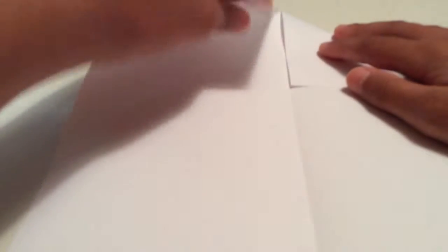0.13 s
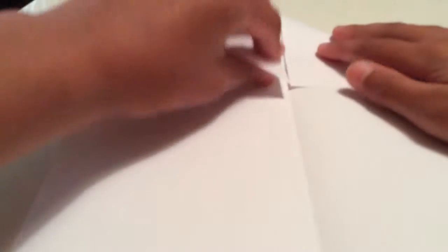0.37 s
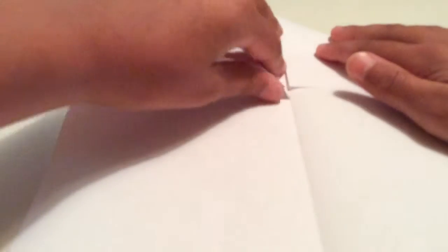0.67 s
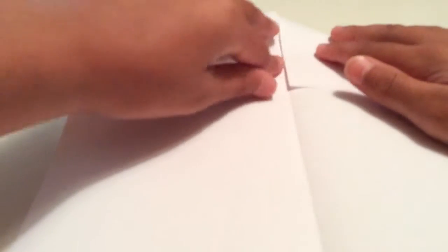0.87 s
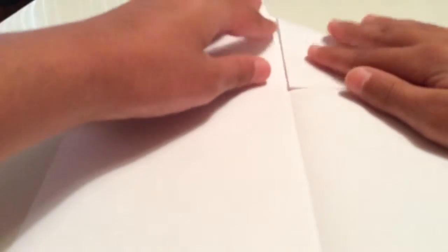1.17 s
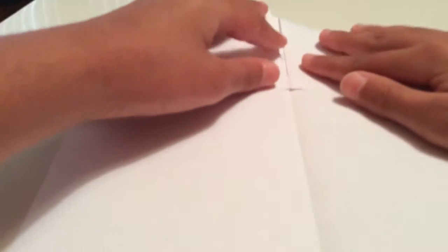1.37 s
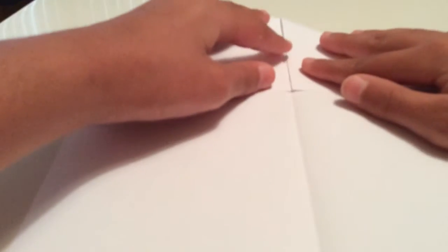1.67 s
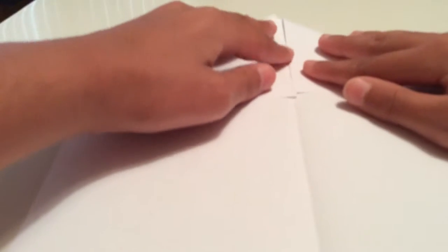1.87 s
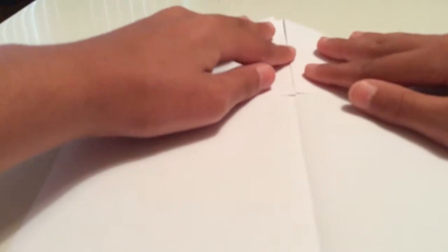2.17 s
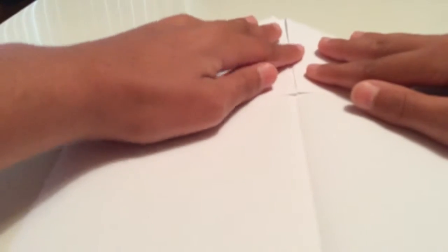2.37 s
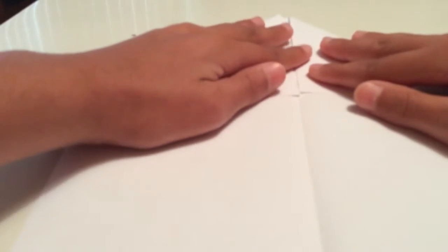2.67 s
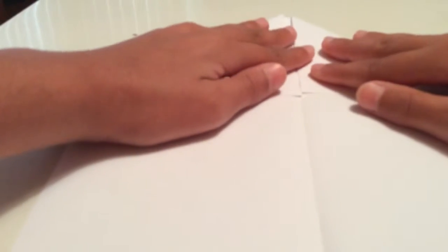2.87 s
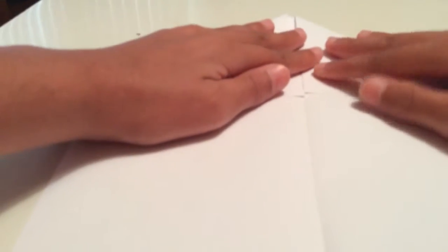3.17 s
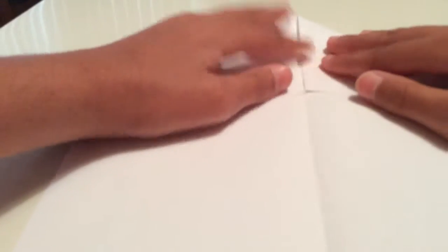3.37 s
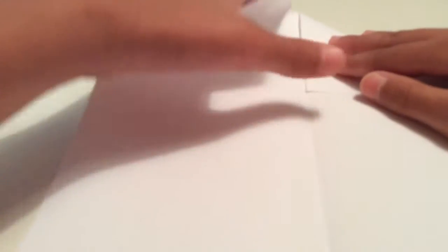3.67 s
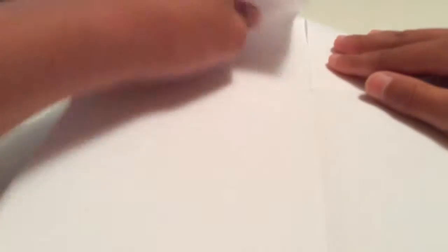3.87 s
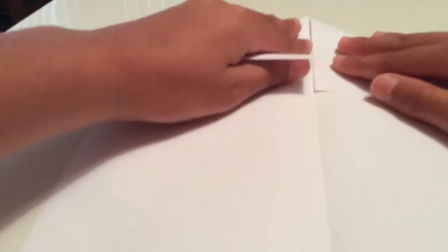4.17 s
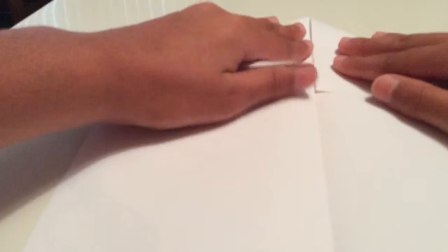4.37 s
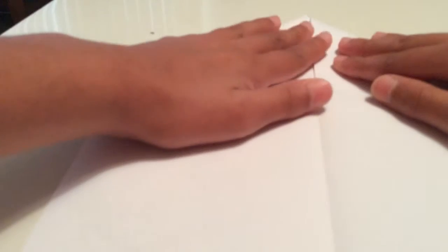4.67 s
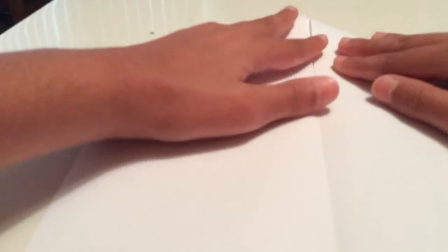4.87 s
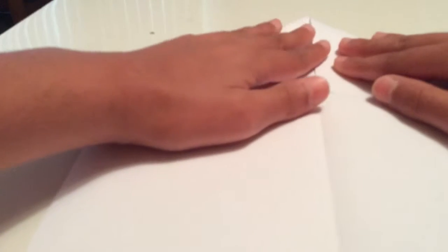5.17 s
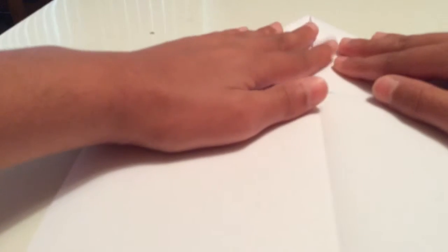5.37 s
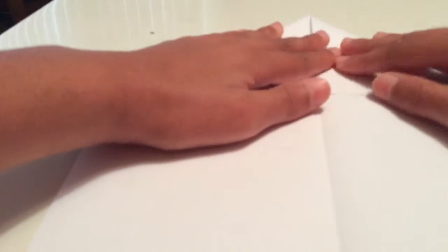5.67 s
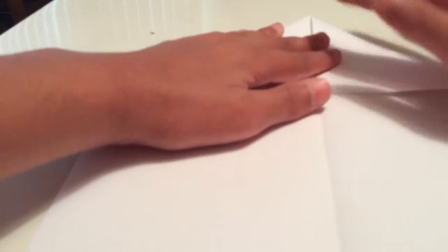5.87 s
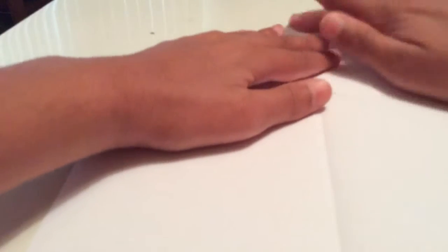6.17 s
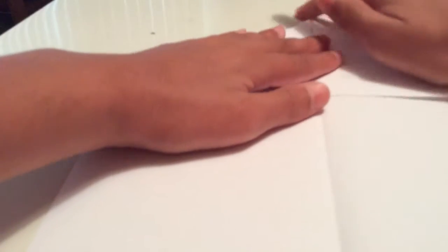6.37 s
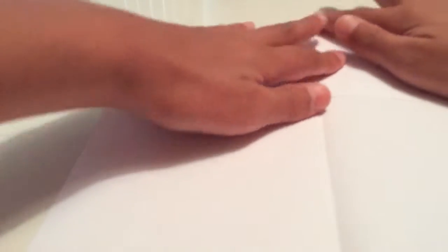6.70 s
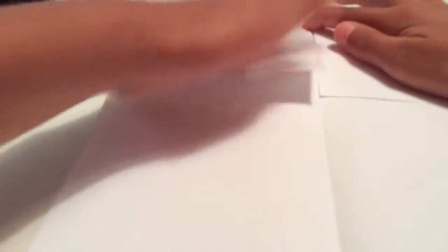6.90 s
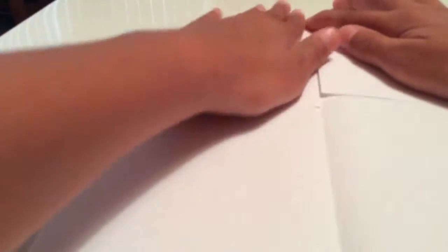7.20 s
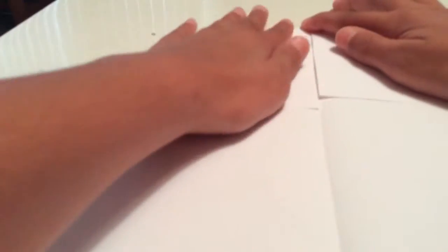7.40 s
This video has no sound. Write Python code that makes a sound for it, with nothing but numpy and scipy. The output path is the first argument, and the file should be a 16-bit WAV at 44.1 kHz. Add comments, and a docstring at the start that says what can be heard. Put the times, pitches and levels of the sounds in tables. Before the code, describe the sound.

Soft, dry rubbing of fingers on paper comes in short, uneven strokes as a sheet is creased against a tabletop. A crisp snap comes early, the rubbing thins, and then the loudest snap breaks through. More strokes, a lull, another snap and a brief run of crackles follow, ending with a finger knock and light rustling. The microphone is near, in a small room with a low ventilation hum.

```python
"""Hands fold and crease a sheet of paper on a hard table, in a small quiet room where ventilation rumbles.
From the start, skin and paper slide with a grainy friction hiss and fingers knock the table top.
The sheet buckles with a sharp snap near 0.8 s; the rubbing thins out, then builds to the loudest snap
near 3.5 s. More strokes lead to a lull, a snap near 5.8 s and a run of snaps near 6.3 s.
The firmest knock falls near 7.1 s, among the last strokes."""
import sys
import numpy as np
from scipy import signal
from scipy.fft import rfft, irfft, next_fast_len
from scipy.io import wavfile
from scipy.ndimage import uniform_filter1d

SR = 44100
rng = np.random.default_rng(int(sys.argv[2]) if len(sys.argv) > 2 else 0)


def bounce(signal):
    """Save signal as a 16-bit WAV file at the path given by the first command-line argument."""
    frames = np.transpose(np.atleast_2d(signal))
    limited = np.clip(frames, -1, 1)
    pcm = np.round(limited * 32767).astype(np.int16)
    wavfile.write(sys.argv[1], SR, pcm)


N = 332514


def undb(db):
    return 10 ** (np.asarray(db) / 20)


def at_rms(x, db):
    return x * undb(db) / np.sqrt(np.mean(x ** 2))


def at_peak(x, db):
    return x * undb(db) / np.abs(x).max()


def decay(t, t60):
    """Exponential damping: the amplitude falls 60 dB in t60 seconds."""
    return np.exp(-np.log(1000) * t / t60)


def ring(x, hz, *widths_hz):
    """Resonance: one two-pole resonator per bandwidth, in series, with gain 1 at the centre."""
    for width_hz in widths_hz:
        x = signal.lfilter(*signal.iirpeak(hz, hz / width_hz, fs=SR), x)
    return x


def colour(x, points):
    """Spectral shaping: the gain follows (Hz, dB) points on a logarithmic frequency axis."""
    hz, db = np.transpose(points)
    size = next_fast_len(len(x))
    bin_hz = np.maximum(np.arange(size // 2 + 1) * SR / size, 1)
    gain = undb(np.interp(np.log(bin_hz), np.log(hz), db))
    return irfft(rfft(x, size) * gain, size)[:len(x)]


def wander(rate_hz):
    """Random modulation: held random values, smoothed twice, with standard deviation 1."""
    hold = int(SR / rate_hz)
    steps = np.repeat(rng.standard_normal(N // hold + 1), hold)
    smooth = uniform_filter1d(uniform_filter1d(steps, hold), hold)[:N]
    return smooth / smooth.std()


def add(track, start_s, sound):
    """Superposition: a short sound adds to the track from start_s on."""
    i = int(start_s * SR)
    track[i:i + len(sound)] += sound[:N - i]


# Spectrum of the moving air. Each row: frequency in Hz, relative spectral density in dB.
AIR_SPECTRUM = [(15, -55.5), (25, -59), (35, -16.5), (61, -1), (99, -8), (221, -7), (322, -11.5), (469, -7),
                (722, -16.5), (895, -24), (1200, -30), (1620, -36.5), (2300, -39), (3500, -38),
                (15500, -39)]
# Duct drones. Each row: frequency in Hz, bandwidth of each resonator in Hz, RMS level in dB.
DUCT_DRONES = [(52.4, 3.7, -75), (70.45, 4.7, -68), (145.7, 4.8, -76), (354.3, 12, -71.5), (403.2, 42, -69),
               (465.5, 40, -71), (618, 57, -73)]

def ventilation():
    """Flow noise and duct resonance: a broad rumble with narrow drones, all wavering in level."""
    air = at_rms(colour(rng.standard_normal(N), AIR_SPECTRUM), db=-61) * undb(1.3 * wander(5.1))
    for hz, width_hz, db in DUCT_DRONES:
        drone = ring(rng.standard_normal(N), hz, width_hz, width_hz)
        air += at_rms(drone, db) * undb(1.2 * wander(4))
    return air


def room(x):
    """Reverberation: early scatter from hands and sheet dies first, then a short tail from the walls."""
    t = np.arange(int(.3 * SR)) / SR
    envelope = undb(9) * decay(t, t60=.025) + decay(t, t60=.058)
    response = rng.standard_normal(len(t)) * envelope * np.clip(t / .0015, 0, 1)
    response += .6 * ring(response, 3350, 6700)
    return signal.fftconvolve(x, response * undb(-7.5) / np.sqrt(np.sum(response ** 2)))[:N]


# Notches in the tone colour. Each row: centre in Hz, bandwidth in Hz, share of amplitude lost.
COLOUR_DIPS = [(770, 110, 0.57), (1407, 140, 0.39)]

def colour_dips(x):
    """Band-stop filtering: notches near 770 and 1400 Hz slightly hollow the snaps, knocks and friction."""
    for hz, width_hz, share in COLOUR_DIPS:
        x = x - share * ring(x, hz, width_hz)
    return x


# Table top modes, grouped low, middle, upper. Each row: frequency in Hz, T60 in seconds, gain in dB.
TABLE_MODES = [
    [(161, 0.11, -1.5), (258, 0.085, -5.5)],
    [(399.4, 0.023, 2), (454, 0.067, -6)],
    [(621.6, 0.092, 4.5), (686.5, 0.049, -0.5)],
]
# Finger knocks. Each row: start in seconds, peak level of the low group in dB before each mode's gain,
# offsets from it of the middle and upper groups in dB.
FINGER_KNOCKS = [(0.393, -53.5, -11, -22), (0.7244, -46.5, 9.5, -6), (0.768, -52.5, 6.5, 3),
                 (1.332, -55, -11, -12), (1.79, -69.5, 7, 12.5), (2.158, -50.5, 0, -5),
                 (3.458, -57, -2, 17.5), (3.859, -58, 3, 3), (4.249, -56.5, -5, -20),
                 (4.417, -58.5, -14, -0.5), (4.954, -52, -6, -3.5), (5.574, -47, -11.5, -8),
                 (5.786, -51, 18, 10.5), (6.015, -58, 4, 2.5), (6.256, -65.5, -8, 14),
                 (6.292, -46, -21, 11), (6.658, -62.5, 14.5, 6.5), (6.69, -67, -8, 9), (6.895, -61, -6, -9),
                 (7.064, -33.5, -1, -3), (7.105, -45, -1, -3), (7.351, -46, -5.5, -7.5),
                 (7.373, -51.5, 3, 1), (7.423, -58, -15, 10)]

def finger_knocks():
    """Modal vibration: a soft push rings the table top, each group as strongly as the spot allows."""
    out, t = np.zeros(N), np.arange(16384) / SR
    contact_s = .002
    push = np.sin(np.pi * np.clip(t / contact_s, 0, 1)) ** 2
    for start_s, db, middle_db, upper_db in FINGER_KNOCKS:
        for group, group_db in zip(TABLE_MODES, (db, db + middle_db, db + upper_db)):
            for hz, t60, mode_db in group:
                width_hz = np.log(1000) / np.pi / t60
                mode = ring(push, hz, width_hz, .6 * hz)
                add(out, start_s, at_peak(mode, group_db + mode_db))
    return out


def fibre_grit(ticks_per_s, scatter_db):
    """Stick-slip: fibres catch and let go, giving noise and random ticks, most small, a few larger."""
    timing, size, polarity = rng.random((3, N))
    size_db = scatter_db * np.minimum(-np.log(size + 1e-9), 3)
    ticks = (timing < ticks_per_s / SR) * undb(size_db) * np.sign(polarity - .5)
    return rng.standard_normal(N) + 3 * ring(ticks, 5000, 6000)


# Strokes of skin and paper. Each row: start and end in seconds, hiss level at start and end in dB
# before the stutter, offsets from the hiss of the treble and the low mids in dB.
HAND_STROKES = [(0.0, 0.164, -65.5, -63.5, -0.5, -3.5), (0.184, 0.39, -70, -61.5, 0, -2.5),
                (0.418, 0.527, -68, -67, -1.5, -1.5), (0.537, 0.688, -61.5, -63, 0, 0.5),
                (0.708, 0.74, -57, -48.5, -4.5, 1.5), (0.765, 0.797, -45, -59, -3, -2),
                (0.82, 1.004, -63, -58.5, -3, -2.5), (1.006, 1.067, -54.5, -49.5, -2.5, -7.5),
                (1.073, 1.322, -57, -66.5, -3.5, -4), (1.333, 1.463, -60.5, -69.5, -5.5, -6),
                (1.504, 1.568, -67, -64, -11, -11), (1.604, 1.695, -87, -69, -14, 2),
                (1.72, 1.871, -62, -66, -5, -4), (1.91, 1.981, -74.5, -74, -1, 5),
                (2.062, 2.212, -66.5, -62.5, -1.5, -3), (2.244, 2.503, -70, -67.5, -7, -7.5),
                (2.555, 2.883, -77, -80, -15, -5), (2.947, 3.055, -73.5, -85, -9, -9),
                (3.095, 3.105, -74, -78, 4, -8), (3.135, 3.306, -80, -78.5, 1, -3),
                (3.335, 3.395, -69.5, -63.5, 3.5, 2.5), (3.407, 3.462, -56.5, -51, -5.5, -2),
                (3.461, 3.515, -45.5, -59, 2, -4), (3.526, 3.696, -64.5, -66.5, 1, -2),
                (3.71, 3.923, -76.5, -58, 2, -4.5), (3.93, 4.029, -62, -58, 0, -7),
                (4.045, 4.19, -61, -69.5, 0, -4.5), (4.207, 4.29, -69, -63, -3.5, -9),
                (4.316, 4.407, -79, -64.5, 5, -3), (4.425, 4.647, -63.5, -76, 3, 0),
                (4.696, 4.767, -77, -83, 3, -4), (4.788, 4.86, -76.5, -77.5, 7.5, -4),
                (4.857, 4.938, -66, -60, -3.5, -7.5), (4.948, 5.037, -62.5, -80.5, -4, -12),
                (5.267, 5.32, -85, -83, -8, 9), (5.427, 5.454, -62, -64, -9, -9),
                (5.682, 5.726, -64.5, -64.5, -7, -13), (5.74, 5.78, -79, -83, 4, -5),
                (5.791, 5.87, -42, -82, -5, -5), (6.017, 6.077, -69.5, -82, 4, 0),
                (6.096, 6.142, -70.5, -57.5, -3, -4), (6.165, 6.277, -67, -62.5, 1, 5),
                (6.294, 6.369, -48, -67, -21, 5), (6.384, 6.504, -78.5, -68.5, 8, -10),
                (6.55, 6.561, -71.5, -68.5, 4, -4), (6.599, 6.654, -70, -66, 3.5, -4),
                (6.683, 6.73, -68, -85, -13, 5), (6.795, 6.891, -71.5, -62.5, -2.5, -4.5),
                (6.886, 6.94, -75, -83, 5, -4), (7.068, 7.142, -69, -58.5, -3, 4),
                (7.156, 7.31, -64.5, -65.5, 7, -9), (7.316, 7.418, -61.5, -54, -8.5, -5),
                (7.435, 7.538, -66.5, -59, 9, -7)]

def stroke_gains():
    """Power summation: strokes grip, glide and let go, setting the gains of hiss, treble and low mids."""
    grip_s, let_go_s = .006, .013  # time constants
    resting_db = -85  # resting hands never lie quite still
    t, power = np.arange(N) / SR, np.full((3, N), undb(resting_db) ** 2)
    for start, end, start_db, end_db, treble_db, low_db in HAND_STROKES:
        edges = np.exp(np.minimum(t - start, 0) / grip_s - np.maximum(t - end, 0) / let_go_s)
        glide = undb(np.interp(t, [start, end], [start_db, end_db]))
        power += (edges * glide * undb([[0], [treble_db], [low_db]])) ** 2
    return np.sqrt(power)


# Spectrum of the friction. Each row: frequency in Hz, relative gain in dB.
FRICTION_SPECTRUM = [(880, -56.5), (1500, -23), (2590, 1.5), (2830, -0.5), (3090, -5), (4570, -4),
                     (5450, -5.5), (6960, -11), (8880, -11.5), (15500, -17)]
# Sheet resonances. Each row: frequency in Hz, bandwidth in Hz before widening by 1.1, relative gain in dB.
SHEET_MODES = [(1856, 140, 5.5), (2410, 39, -6), (3094, 80, -0.5), (3470, 140, -7), (5000, 620, -23),
               (5650, 52, -20.5), (6530, 250, -19), (9300, 120, -12)]

def sliding_paper():
    """Sliding friction: three bands of grit stutter together as the bending sheet's modes come and go."""
    hiss_gain, treble_gain, low_gain = stroke_gains()
    friction = colour(fibre_grit(ticks_per_s=320, scatter_db=3.5), FRICTION_SPECTRUM)
    hiss = signal.sosfiltfilt(signal.butter(2, 7000, fs=SR, output="sos"), friction)
    treble = friction - hiss
    flicker_db = 4.2
    ringing = sum(undb(db + flicker_db * wander(35)) * ring(hiss, hz, 1.1 * width_hz)
                  for hz, width_hz, db in SHEET_MODES)
    low_mids = ring(fibre_grit(ticks_per_s=300, scatter_db=1.5), 1098, 550, 1200)
    stutter_db = .97 * wander(40) + wander(120)
    return (hiss_gain * at_rms(hiss + 1.8 * ringing, 0) * undb(stutter_db + .52 * wander(40))
            + treble_gain * at_rms(treble, 0) * undb(1.3 * stutter_db)
            + low_gain * at_rms(low_mids, 0) * undb(stutter_db + 1.3 * wander(20)))


# Buckles of the sheet. Each row: time in seconds, peak level of the main band in dB, its centre in Hz,
# its first resonator's bandwidth over that centre, offsets of the treble and low-mid peaks in dB.
BUCKLES = [(0.051, -53, 2500, 0.89, 7, 6.5), (0.1535, -45.5, 3260, 0.33, -2, -11),
           (0.214, -46.5, 2970, 1, 1, -29), (0.7242, -49, 2690, 1, -4, 17),
           (0.7286, -30.5, 3100, 0.6, -19, 1.5), (0.739, -39, 3290, 1.3, -12, -21),
           (0.7711, -13.5, 4400, 0.61, -6, -9), (1.0227, -48, 2700, .68, -10, -16),
           (1.0663, -47, 2800, .46, -11, -5), (1.3412, -52, 3570, .33, -12, -7),
           (1.9147, -56, 2730, 0.72, -10, -16), (1.9403, -53.5, 3250, 0.59, 1, -1),
           (1.9697, -48.5, 2130, 0.83, -7, -12), (2.0629, -55, 3440, 1.3, 0, -20),
           (2.11, -54, 3130, 0.78, 3, 1), (2.1571, -55, 2920, .85, 1, 3),
           (2.1978, -45.5, 5150, .42, -7, -16), (2.315, -51.5, 3400, 0.31, -1, -10),
           (2.7105, -62, 3860, .68, -3, 5.5), (3.1014, -57.5, 3050, .65, -6, -1),
           (3.2352, -52, 3550, 0.62, -2, -5), (3.312, -55, 3000, 0.91, -7, -5),
           (3.3528, -38, 3260, 0.36, -16, -17), (3.458, -7.5, 2500, 1.38, -12, -9),
           (3.5272, -44.5, 2700, 0.27, -15, -24), (3.587, -46, 3110, 0.92, -9, -19),
           (3.612, -54.5, 3380, 0.38, -3, -3), (3.6337, -41.5, 2820, 1, -5, -7),
           (3.639, -57, 2000, 1, -3, 15.5), (3.7257, -52.5, 3670, 1.2, 1, 1),
           (3.8266, -50, 3090, 0.56, -14, -3), (3.9135, -36, 3260, .16, -12, -31),
           (3.958, -43.5, 2400, 0.93, -11, -7), (4.0316, -30, 2890, 0.42, -13, -14.5),
           (4.109, -47, 2910, 1, -5, -1), (4.1517, -40, 2800, 0.37, 0, -1.5),
           (4.181, -43.5, 3910, 1.2, -8, -3.5), (4.2323, -42.5, 3680, 0.88, -8, -18),
           (4.405, -49, 2300, 1, -4, -3), (4.4184, -44.5, 2560, 0.22, -18, 10.5),
           (4.476, -46.5, 3000, 0.52, -3, -2), (4.645, -58, 3000, 0.7, -11, -4),
           (5.2703, -57, 3600, 1.3, -4, 2), (5.4095, -51, 3500, 1, -4, -9), (5.416, -54, 3000, 1, 2, -13),
           (5.4277, -33, 3510, 0.48, -12, -8.5), (5.445, -42, 3700, .8, -5, -16),
           (5.572, -53.5, 3500, 0.84, 2, -9), (5.58, -55, 1700, 0.82, -13, 6),
           (5.786, -28, 3540, 0.39, 2, -4), (5.7892, -17.5, 5200, 0.39, 3, -31),
           (5.7906, -26, 1510, 0.3, -14, -30), (6.0147, -45.5, 3360, 1.15, -10, -31),
           (6.141, -38.5, 2360, .3, -16, -26), (6.228, -50, 1800, 0.33, -12, -10),
           (6.2752, -33.5, 3570, 0.8, -16, -30), (6.2849, -35, 3100, 0.38, -19, -14),
           (6.2898, -30, 3800, 0.4, -21, -9), (6.3015, -22, 2960, 0.79, -24, -8),
           (6.3143, -22, 2300, 0.71, -22, -11), (6.3194, -15.5, 2470, 1.02, -24, -24),
           (6.3381, -27.5, 3300, 0.96, -22, -16), (6.662, -32, 1917, 0.26, -25, 6),
           (6.683, -48, 4100, 0.68, -8, -9), (6.8833, -42.5, 3930, 0.54, -1, -16),
           (6.896, -39.5, 2340, 0.43, -8.5, -2.5), (7.0751, -44.5, 3190, 0.72, -16, -1),
           (7.131, -31.5, 2630, 0.52, -22, -8.5), (7.3261, -44, 3720, 0.24, -2, -23),
           (7.3403, -41, 3470, .48, -8, -17), (7.347, -39, 3610, 0.32, -7, -6),
           (7.36, -33.5, 2540, .54, -21, -21), (7.3713, -53.5, 2400, .81, -5, 14),
           (7.3853, -48, 3620, 0.32, -8, -17), (7.397, -38.5, 3120, .54, -16, -24),
           (7.4102, -40, 3680, 0.3, -12, -26), (7.425, -45.5, 2540, 0.36, -9, -8)]

def buckling_snaps():
    """Snap-through buckling: a creak grows into a tick and a rattle follows, heard in three bands."""
    creak_rise_s, creak_db, rattle_t60_s = .0012, -9, .016
    echo_s, echo_share = .0005, .75  # each tick reflects off the table
    out, lead = np.zeros(N), 512  # samples ahead of the tick
    t = (np.arange(4096) - lead) / SR
    tick = 1. * (t == 0)
    tick[lead + int(echo_s * SR)] = echo_share
    envelope = np.where(t < 0, undb(creak_db) * np.exp(t / creak_rise_s), decay(t, rattle_t60_s))
    for time_s, db, hz, relative_width, treble_db, low_db in BUCKLES:
        rattle_db = -31 - .42 * db  # softer snaps hold a larger share of rattle
        burst = tick + undb(rattle_db) * rng.standard_normal(len(t)) * envelope
        width_hz = hz * relative_width
        main = at_peak(ring(burst, hz, width_hz, 2 * width_hz), db)
        treble = at_peak(ring(burst, 9100, 16000, 14000), db + treble_db)
        low_mids = at_peak(ring(burst, 1098, 260, 610), db + low_db)
        # the treble swings in opposite sense to the main band, so no hole opens between them
        add(out, time_s - lead / SR, main - treble + low_mids)
    return out


def scene():
    """Superposition: snaps and knocks with their reverberation, and dry friction, over ventilation."""
    impacts = buckling_snaps() + finger_knocks()
    folding = colour_dips(impacts + room(impacts) + sliding_paper())
    return (folding + ventilation())[None]


def record(dry):
    """Band limiting: the nearby phone cuts the treble above 15450 Hz."""
    return signal.sosfilt(signal.ellip(10, .2, 70, 15450, fs=SR, output="sos"), dry)


dry = scene()
out = record(dry)
bounce(out)
```